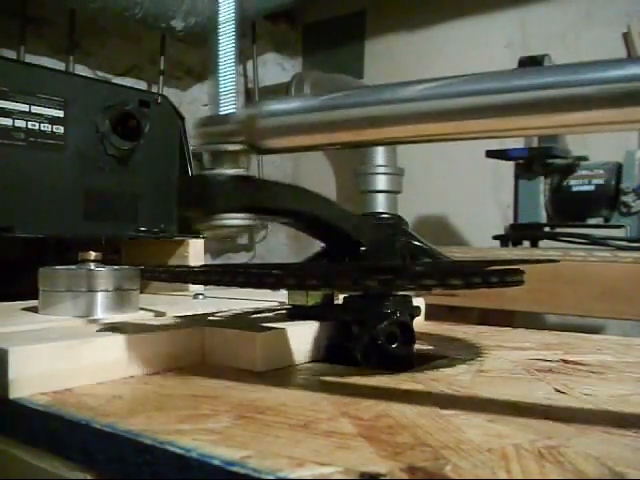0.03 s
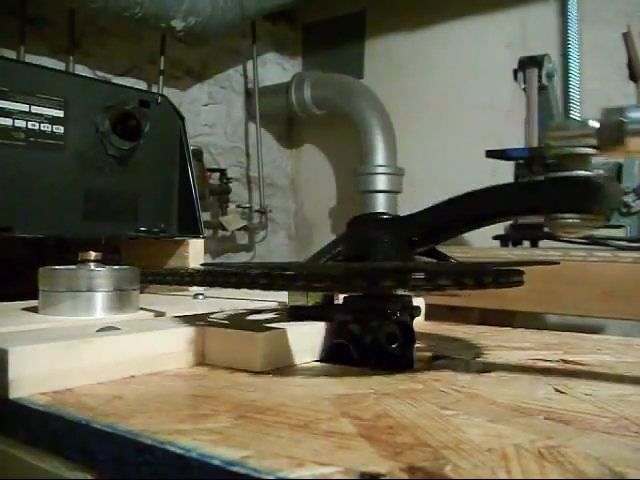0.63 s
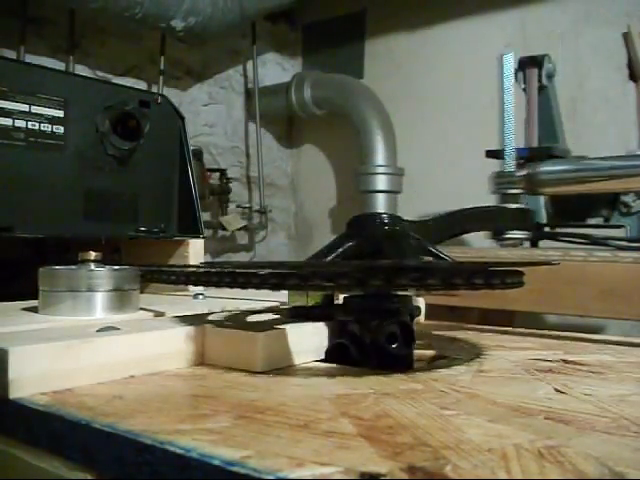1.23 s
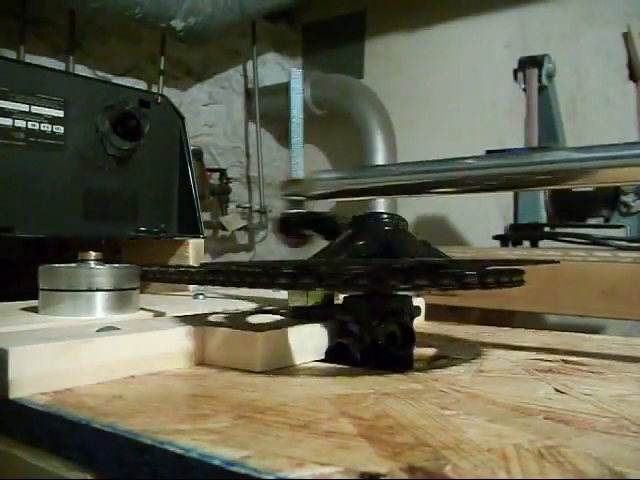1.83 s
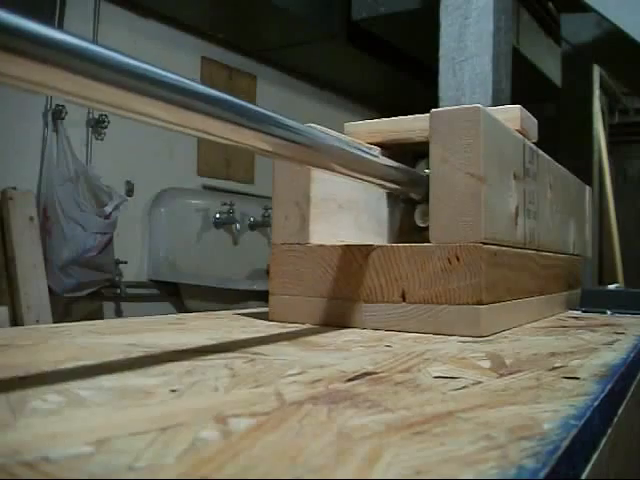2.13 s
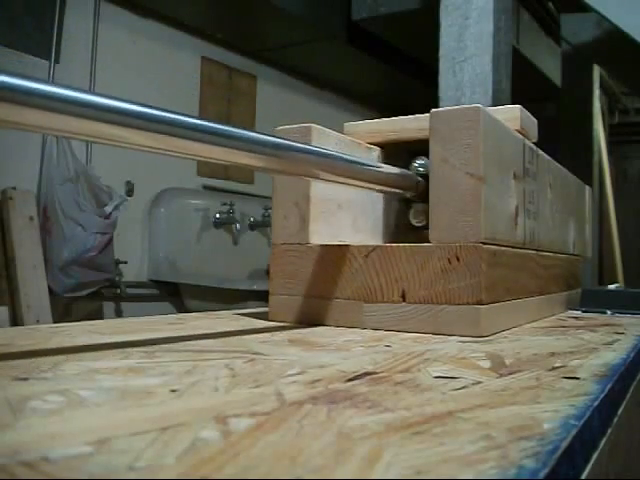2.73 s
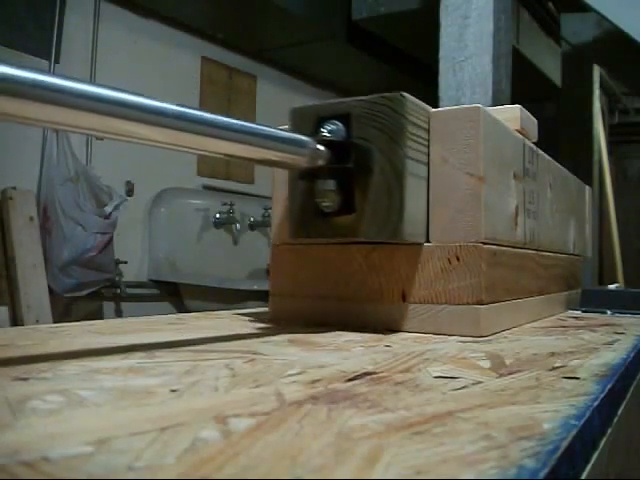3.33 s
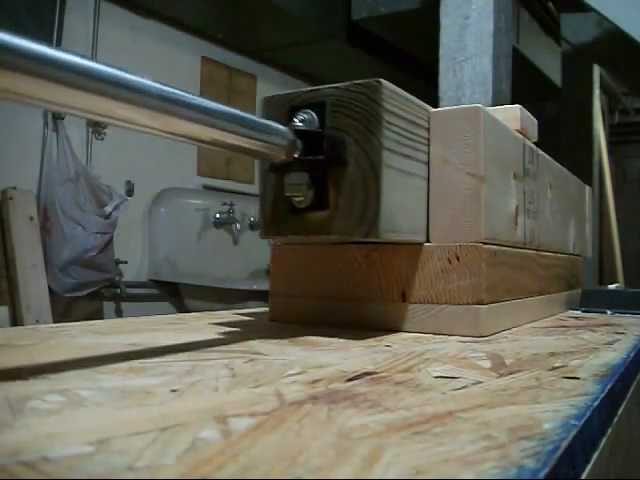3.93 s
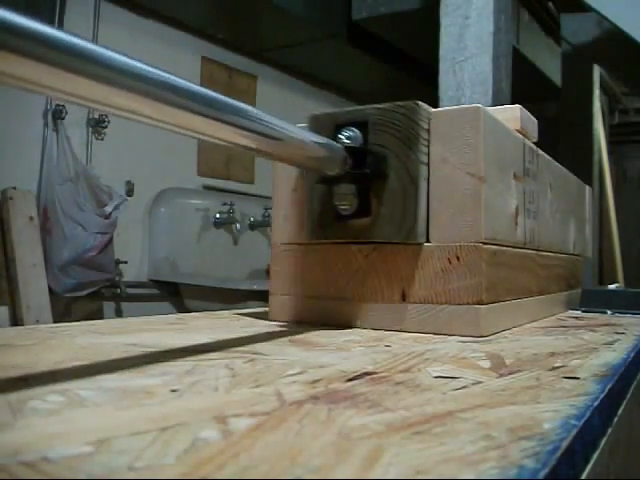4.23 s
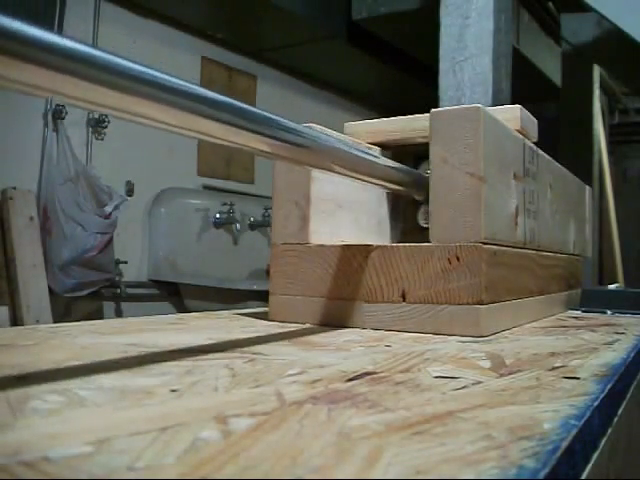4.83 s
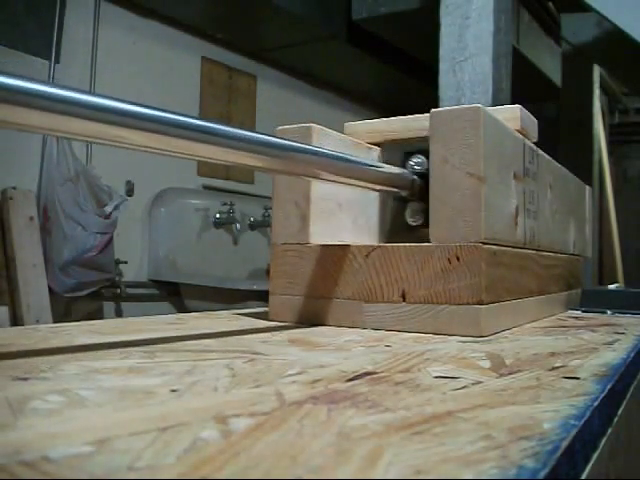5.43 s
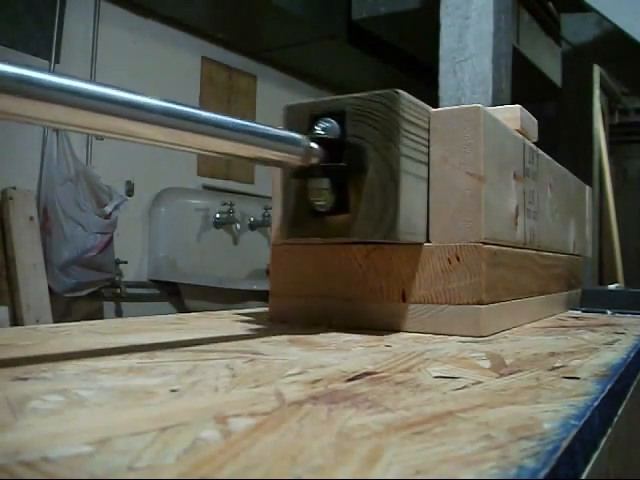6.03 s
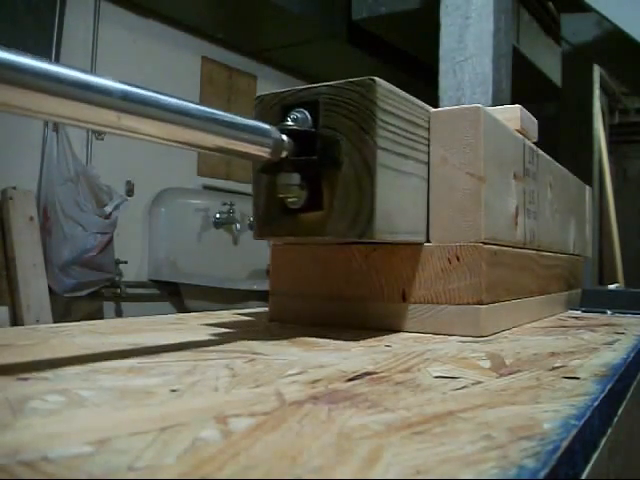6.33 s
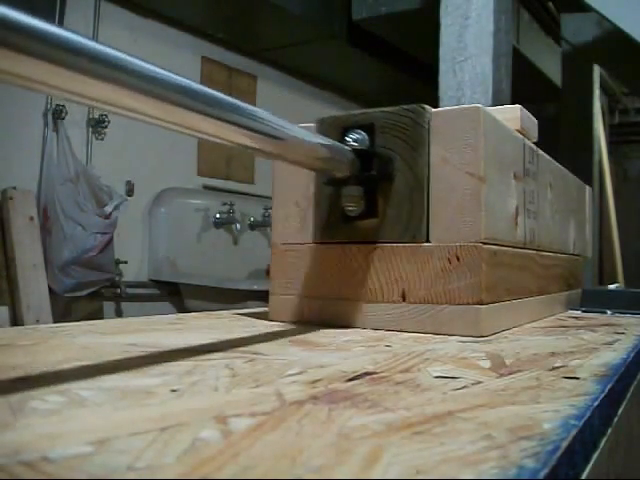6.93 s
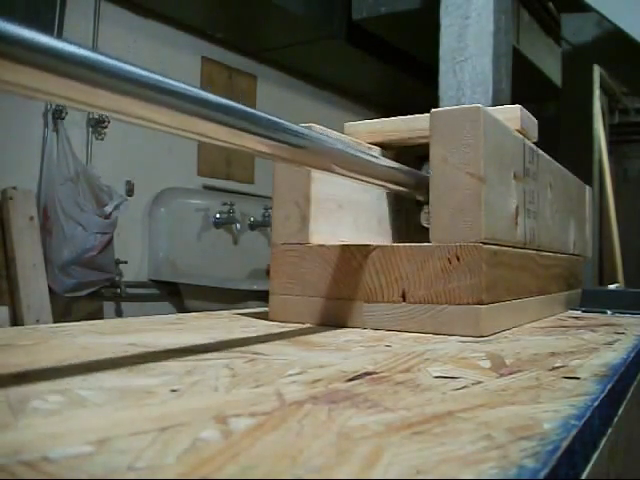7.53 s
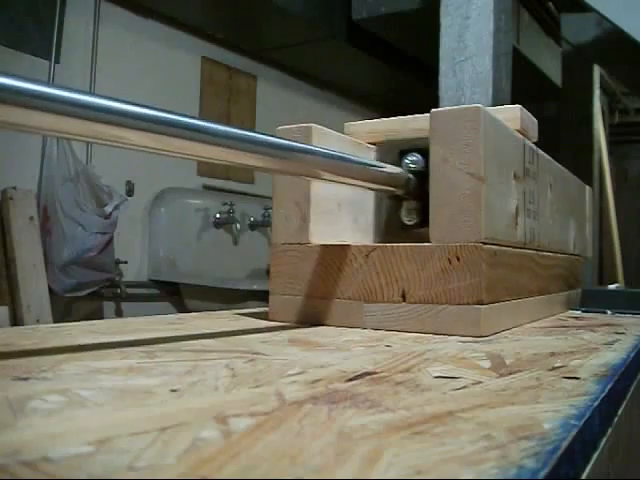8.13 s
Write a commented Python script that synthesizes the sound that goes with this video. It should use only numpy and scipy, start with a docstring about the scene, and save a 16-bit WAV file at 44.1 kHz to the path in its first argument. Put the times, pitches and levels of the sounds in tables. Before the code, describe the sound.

Close up in a workshop, a crank machine runs with a buzzing motor drone, a faint whine and a rattling chain. Sharp metal clacks with wooden thuds come in bunches a little over a second apart. About two seconds in, a short dropout and the loudest knock shift the listening spot from the crank to a sliding wooden block, which rubs, scuffs and judders as the drone swells and eases. The microphone sounds band-limited and distorts on hard hits.

```python
"""A small mains motor turns a chain wheel and crank, and a steel rod pushes a wooden block to and fro.
The motor hums through the bench, the chain rattles, the block rubs and binds in its wooden guide,
and at each end of the stroke the loose rod joints clack into the workshop.
Heard first beside the crank, then, after a short break, beside the block,
through a narrow-band recorder that overloads."""
import sys
import numpy as np
from scipy import signal
from scipy.fft import rfft, irfft, next_fast_len
from scipy.io import wavfile
from scipy.ndimage import uniform_filter1d

SR = 44100
rng = np.random.default_rng(int(sys.argv[2]) if len(sys.argv) > 2 else 0)


def log_audio(samples):
    """Write samples as a 16-bit WAV file to the path given in sys.argv[1]."""
    # one column per channel
    frames = np.atleast_2d(samples).T
    # limit to full scale, then quantise
    limited = np.clip(frames, -1, 1)
    pcm = np.round(limited * 32767).astype(np.int16)
    wavfile.write(sys.argv[1], SR, pcm)


N = 361179
TIME = np.arange(N) / SR
TURN_S, DEEPEST_S = 2.656, 2.54   # one crank turn; a moment when the block is deepest in its guide
PUSH_AT_S, PUSH_HALF_S = 2.35, 0.31   # where in the turn the block is pushed home

# Modes of the free steel rod. Each row: pitch in Hz, level in dB, ring time (t60) in seconds.
ROD_MODES = [(1335, -14, .08), (1510, -7, .17), (2058, -9, .18), (2686, -3, .14), (2950, -7, .08),
             (3085, -10, .1), (3340, -1, .16), (3400, -8, .1), (4040, 0, .2), (4080, -6, .17),
             (4836, -4, .2), (4885, -8, .16)]
# The colour of wood rubbing on wood. Each row: frequency in Hz, level in dB.
RUB_COLOUR = [(500, -27.5), (900, 1), (1100, -1), (1420, 1), (1700, -4.5), (2050, -7), (2400, -7),
              (3400, -28.5), (5500, -19)]
# The dropout between the two listening places. Each row: time in seconds, gain in dB.
BREAK_DIP = [(2.028, 0), (2.030, -18), (2.060, -17), (2.063, -6), (2.082, -5), (2.088, 0)]


def motor(mains_hz=60, crank_drone_hz=120.2, block_drone_hz=119.7, sag_hz=.7):
    """Magnetic buzz and whine locked to the mains, over a drone that sags and swells with the load."""
    # The motor beside the crank. Each row: time in seconds, then drone, buzz and whine levels in dB.
    at_crank = [(0, -26, -36, -45), (.36, -24, -39, -39), (.55, -30.5, -38, -42), (.88, -32, -45.5, -37),
                (1.03, -43, -41, -40), (1.15, -29, -36, -40.5), (1.66, -29.5, -32.5, -49),
                (1.92, -46, -38.5, -44), (2.02, -52, -31, -51)]
    # Beside the block. Each row: seconds into the turn, then drone, buzz and whine levels in dB.
    at_block = [(.03, -31, -24, -32.5), (.11, -24, -29, -30.5), (.25, -14, -25, -43.5),
                (.48, -17, -24, -41), (.8, -26, -26.5, -29.5), (.94, -34, -23.5, -33),
                (1.05, -26, -23.5, -36), (1.33, -21.5, -23.5, -31.5), (1.45, -23.5, -29.5, -29.5),
                (1.55, -16, -24.5, -30.5), (1.96, -24.5, -30, -29), (2.17, -15, -23, -31),
                (2.35, -16.5, -23, -38.5), (2.54, -16, -21, -31.5)]
    # Buzz partials. Each row: multiple of twice the mains frequency, dB at the crank, dB at the block.
    partials = [(.5, -22.5, -22), (2, 0, 0), (3, -11.5, -4.5), (4, -10, -19), (5, -8, -15.5),
                (7, -20, -9.5), (9, -14.5, -20.5), (10, -16.5, -27)]
    drone_db, buzz_db, whine_db = by_place(in_time(at_crank), every_turn(at_block))
    # From 2.09 s, drone and buzz start subdued and rise back over half a second.
    subdued = by_place(0, np.clip(1 - (TIME - BREAK_DIP[-1][0]) / .5, 0, 1))
    drone_db = drone_db - 14.5 * subdued
    buzz_db = buzz_db - 10 * subdued
    push = swell(in_turn(), PUSH_AT_S, PUSH_HALF_S)
    drone_hz = by_place(crank_drone_hz, block_drone_hz - sag_hz * push)
    hum = from_db(drone_db + 0.81 * drift(14)) * sine(drone_hz)
    # The rotor thrums through the bench, an octave down, while it pushes the block.
    thrum = by_place(0, from_db(-39.5) * swell(in_turn(), at_s=1.8, half_s=0.44))
    hum += thrum * sine(drone_hz / 2)
    hum += from_db(whine_db) * np.sin(2 * np.pi * 12 * mains_hz * TIME)
    for multiple, crank_db, block_db in partials:
        phase = 2 * np.pi * (2 * multiple * mains_hz * TIME + rng.random())
        level_db = buzz_db + by_place(crank_db, block_db) + 2.1 * drift(3.4)
        hum += from_db(level_db) * np.sin(phase + 0.46 * drift(6.5))
    return np.sqrt(2) * hum


def clacks(chatter_s=0.0053, ping_s=0.0062, detune=0.00082):
    """Loose joints knock as the stroke reverses: metal chatter, a ping, rod ring and a wooden thud."""
    # The knocks. Each row: start in seconds, level in dB, ping in Hz, relative thud and ring in dB.
    knocks = [(.222, -21, 4450, 1, -4.5), (0.628, -19, 2420, 2.5, -13), (0.778, -13, 4740, -8.5, -8.5),
              (0.8549, -5, 3930, -15, -15), (.900, -6.5, 4730, -9, -12), (.9175, -11.5, 4160, -3, -8),
              (.9241, -9, 3150, 5.5, -6.5), (1.156, -21, 4390, 1, -14), (2.0885, 12.5, 4035, -23, -10.5),
              (2.0944, 5.5, 2670, -18, -8.5), (2.099, 0.5, 1490, -20, -14), (2.1113, 8.5, 3330, -12.5, -27),
              (2.540, -7, 3340, -4, -6), (2.5847, -4, 4140, -20, -5), (2.599, -4, 3040, -23, -30),
              (2.604, -5.5, 2700, -5.5, -4.5), (3.688, -19.5, 3440, -5, -16.5), (3.707, -15, 3500, -1, -14),
              (3.756, -15.5, 3310, -1, -19), (3.847, 1.5, 3387, -30, -14.5), (3.8635, -8, 3270, -21, -9),
              (3.917, -8, 4560, -9, -5), (3.9234, -7, 3020, -6, -21), (3.941, -11, 3600, -3, -27),
              (3.98, -8.5, 3342, -9.5, -10), (4.744, -19, 3853, -10.5, -12), (5.1954, -7.5, 4860, -4.5, -9),
              (5.241, -10.5, 4030, -5, -4.5), (5.256, 0, 2970, -13, -22), (5.2661, -13.5, 2860, -3, -22),
              (6.349, -15.5, 3400, -3.5, -11.5), (6.398, -19.5, 3410, -4, -12),
              (6.415, -13, 3320, -0.5, -20), (6.513, -6, 4080, -12.5, -7), (6.536, -9.5, 4130, -10.5, -9.5),
              (6.576, -10.5, 4010, -7.5, -7.5), (6.590, -5, 3250, -6.5, -21), (6.600, -6, 3120, -12, -20),
              (6.626, -16.5, 3000, 1.5, -20), (7.8536, -3, 3296, -8.5, -5),
              (7.8987, -4.5, 4080, -19.5, -20), (7.9114, -4.5, 4847, -13, -20), (7.920, -4, 3100, -8, -19)]
    # Modes of block and guide. Each row: pitch in Hz, level in dB, ring time (t60) in seconds.
    wood_modes = [(341.7, 2, 0.043), (461, -3, 0.12), (574, -6, 0.088), (792, -5, 0.087),
                  (894, -12.5, 0.06)]
    # Noise colours of the metal contact and the thud. Each row: frequency in Hz, level in dB.
    crack_colour = [(500, -29.5), (1300, 1.5), (2200, -7), (2800, 3), (3400, 2), (3750, -0.5), (4100, -0.5),
                    (4450, -3), (4950, -2), (5600, -10)]
    thud_colour = [(60, -20), (200, 1.5), (420, -4), (800, 4), (1200, -8), (2400, -9), (5000, -41.5)]
    out, t = np.zeros(N + SR), TIME[:SR // 4]
    rod_hz, rod_db, rod_t60 = np.transpose(ROD_MODES)[:, :, None]
    wood_hz, wood_db, wood_t60 = np.transpose(wood_modes)[:, :, None]
    for start_s, level_db, ping_hz, thud_db, ring_db in knocks:
        noise = rng.standard_normal((2, len(t)))
        crack = from_db(-7) * coloured(noise[0], crack_colour) * np.exp(-t / chatter_s)
        ping = from_db(-5) * np.sin(2 * np.pi * ping_hz * t) * np.exp(-t / ping_s)
        ring_hz = rod_hz * (1 + detune * rng.standard_normal(rod_hz.shape))   # load shifts the modes
        # The rod is pressed with the block deep in; drawn out, it is slacker and rings longer.
        drawn_out = np.sin(np.pi * (start_s - DEEPEST_S) / TURN_S) ** 2
        ring_t60 = rod_t60 * (.2 + .5 * drawn_out)
        ring = from_db(ring_db - 3) * struck(t, ring_hz, rod_db, ring_t60, spread_db=2)
        wood = struck(t, wood_hz, wood_db, wood_t60, spread_db=3.5)
        wood += from_db(-1) * coloured(noise[1], thud_colour) * np.exp(-t / 0.014)
        thud = from_db(thud_db - 4) * wood * (1 - np.exp(-t / 0.00043))
        start = round(start_s * SR)
        out[start:start + len(t)] += from_db(level_db) * (crack + ping + ring + thud)
    return out[:N]


def bench(friction_db):
    """Gear teeth and chain links patter into the bench, whose rumble rises with friction and push."""
    # Rumble colours beside the crank and beside the block. Each row: frequency in Hz, level in dB.
    crank_colour = [(25, -19.5), (42, -6), (64, -14.5), (90, -6), (125, 3.5), (190, -16), (250, 3),
                    (590, -8.5), (790, 0.5), (1200, -21), (1600, -51.5)]
    block_colour = [(27, -7), (40, -24), (58, -13), (90, -10), (125, -4.5), (165, -5), (240, -6.5),
                    (290, -7), (650, -16.5), (730, -8.5), (1200, -21), (1600, -52)]
    push_db = 0.25 * swell(in_turn(), PUSH_AT_S, PUSH_HALF_S)
    level_db = by_place(-25.5, -22.5 + push_db) + .6 * friction_db
    patter = boards(grains(per_s=3500, spread_db=1.5))
    noise = rng.standard_normal(N)
    rumble = by_place(coloured(noise, crank_colour), coloured(noise, block_colour))
    return from_db(level_db) * (from_db(-3) * patter + from_db(-5.5) * rumble)


def chain(friction_db):
    """Rollers tick over the sprocket and keep the rod faintly ringing."""
    # Hiss colours beside the crank and beside the block. Each row: frequency in Hz, level in dB.
    crank_colour = [(1180, -27), (2000, -5), (2120, -3), (2190, -9), (2600, -9), (2870, -6), (3180, -7.5),
                    (3350, -7.5), (3610, -7), (4310, -7.5), (5100, -11), (6630, -19), (11200, -120)]
    block_colour = [(1180, -35.5), (2000, 0), (2310, -10), (2680, -2.5), (3050, -2), (3310, -1), (3520, -3),
                    (4100, -1.5), (4550, -3.5), (4850, -5.5), (5100, -6.5), (6630, -20.5), (11200, -120)]
    level_db = by_place(-31.5, -34.5) + 0.99 * friction_db
    ticks = grains(per_s=4100, spread_db=2) * from_db(1.5 * drift(18))
    hiss = by_place(coloured(ticks, crank_colour), coloured(ticks, block_colour))
    ring = rms_one(sum(from_db(db) * resonate(ticks, hz, 4.5 / t60) for hz, db, t60 in ROD_MODES))
    return from_db(level_db) * (from_db(-2.5) * hiss + from_db(-14) * ring)


def rubbing(friction_db):
    """Wood fibres catch and let go in uneven clumps as the block slides."""
    level_db = by_place(-33.5, -34) + 1.05 * friction_db
    catches = grains(per_s=3500, spread_db=0) * from_db(2 * drift(22))
    return from_db(level_db) * coloured(catches, RUB_COLOUR)


def scuffs(scuff_half_s=0.017):
    """The block catches with short gritty scuffs; longer binds on the push shake the bench harder."""
    # Brief catches. Each row: centre in seconds, level in dB.
    snags = [(.233, -27.5), (1.032, -34), (1.377, -32), (1.523, -27.5), (2.472, -31), (2.87, -30),
             (3.213, -30), (3.388, -31.5), (3.564, -27.5), (4.218, -28.5), (4.96, -32), (5.664, -33),
             (6.016, -31.5), (6.08, -30), (7.68, -32), (7.82, -28)]
    # Binds halfway in and near the end. Each row: centre in seconds, level in dB, half length in seconds.
    binds = [(4.674, -29, 0.041), (5.094, -37, .09), (7.334, -28, 0.065), (7.756, -35, 0.19)]
    scuffing = sum(from_db(db) * swell(TIME, at_s, scuff_half_s) for at_s, db in snags)
    binding = sum(from_db(db) * swell(TIME, at_s, half_s) for at_s, db, half_s in binds)
    catches = grains(per_s=2300, spread_db=2.5)
    grit = from_db(3) * (scuffing + binding) * coloured(catches, RUB_COLOUR)
    body = (from_db(-.5) * scuffing + from_db(10.5) * binding) * boards(catches)
    return grit + body


def scrapes(width_hz=980):
    """Steel slides on steel in the rod's joints: thin, dry swells, each around its own pitch."""
    # Each row: centre in seconds, level in dB, half length in seconds, pitch in Hz.
    slides = [(0.076, -28, 0.023, 5200), (0.24, -27, 0.038, 5450), (.8, -27, 0.033, 5150),
              (4.21, -35.5, 0.051, 2700), (4.29, -36.5, 0.036, 3970), (5.892, -30, 0.014, 3230)]
    catches = grains(per_s=1400, spread_db=2)
    return sum(from_db(db) * swell(TIME, at_s, half_s) * rms_one(resonate(catches, hz, width_hz))
               for at_s, db, half_s, hz in slides)


def shudder(slip_hz=60):
    """The block sticks and slips with a low judder where it overhangs the guide."""
    # Each row: centre in seconds, level in dB.
    judders = [(3.8, -28), (6.455, -24)]
    level = sum(from_db(db) * swell(TIME, at_s, half_s=0.1) for at_s, db in judders)
    return np.sqrt(2) * level * sine(slip_hz + 3 * drift(6.9))


def gears(mesh_hz=1417, level_db=-47):
    """A faint wavering mesh tone, carried along the rod to the block."""
    tone = np.sqrt(2) * sine(mesh_hz * (1 + .002 * drift(2)))
    return by_place(0, from_db(level_db + 2 * drift(3)) * tone)


def boards(x):
    """The bench top resonates with whatever shakes it; rms 1."""
    # Its modes. Each row: pitch in Hz, width in Hz, level in dB.
    modes = [(161.6, 25, 1.5), (202, 17, 0), (236, 28, 0.5), (299.8, 20, 4.5), (316.4, 17, 6.5),
             (368.7, 49, 1.5), (448, 36, 1.5), (520.4, 32, -2), (569.4, 28, -2), (671, 45, -5),
             (763, 58, -2.5), (835, 72, -7.5)]
    return rms_one(sum((-1) ** k * from_db(db) * resonate(x, hz, width_hz)
                       for k, (hz, width_hz, db) in enumerate(modes)))


def workshop(x, t60=0.44, wet_db=-13):
    """Adds diffuse echoes from the masonry walls."""
    t = TIME[:SR // 2]
    tail = rng.standard_normal(len(t)) * np.exp(-np.log(1000) * t / t60) * (1 - np.exp(-t / 0.0028))
    return x + from_db(wet_db) * signal.fftconvolve(x, tail / np.linalg.norm(tail))[:N]


def gain_control(x, threshold_db=-6, attack_s=0.04):
    """Very loud knocks pull the gain down, too late to save the attack; it then creeps back."""
    level_db = 10 * np.log10(np.abs(uniform_filter1d(x ** 2, size=256)) + 1e-9)
    over_db = np.maximum(level_db - threshold_db, 0)
    release_ramp = 55 * TIME
    held_db = np.maximum.accumulate(over_db + release_ramp, axis=-1) - release_ramp
    pole = np.exp(-1 / (attack_s * SR))
    return x * from_db(-.6 * signal.lfilter([1 - pole], [1, -pole], held_db))


def by_place(at_crank, at_block):
    """The listener moves from crank to block during the break."""
    return np.where(TIME < BREAK_DIP[1][0], at_crank, at_block)


def in_turn():
    """Seconds since the block was last deepest in its guide."""
    return (TIME - DEEPEST_S) % TURN_S


def every_turn(rows):
    """Each column of a curve that repeats with the crank, at every sample."""
    seconds, *columns = np.transpose(rows)
    return [np.interp(in_turn(), seconds, column, period=TURN_S) for column in columns]


def in_time(rows):
    """Each column of a curve at every sample, its end values held."""
    seconds, *columns = np.transpose(rows)
    return [np.interp(TIME, seconds, column) for column in columns]


def swell(t, at_s, half_s):
    """A bell-shaped rise and fall of height 1."""
    return np.exp(-np.minimum(((t - at_s) / half_s) ** 2, 20))


def drift(rate_hz):
    """A slow random wander with a spread of 1."""
    hop, settle = 40, 2000
    pole = np.exp(-2 * np.pi * rate_hz * hop / SR)
    noise = rng.standard_normal(N // hop + settle + 2)
    slow = signal.lfilter([1], [1, -2 * pole, pole * pole], noise)[settle:]
    return np.interp(np.arange(N) / hop, np.arange(len(slow)), rms_one(slow))


def grains(per_s, spread_db):
    """Tiny random contacts; spread_db makes their sizes uneven."""
    sizes = from_db(spread_db * np.minimum(rng.exponential(1, N), 4)) * rng.choice([-1, 1], N)
    return sizes * (rng.random(N) < per_s / SR)


def struck(t, hz, db, t60, spread_db):
    """Decaying modes, each with a random strength and phase."""
    strengths = from_db(db + spread_db * rng.standard_normal(hz.shape))
    tones = np.sin(2 * np.pi * (hz * t + rng.random(hz.shape)))
    return np.sum(strengths * from_db(-60 * t / t60) * tones, axis=0)


def coloured(x, spectrum):
    """Gives a steady excitation a spectrum; rms 1."""
    size = next_fast_len(len(x))
    hz, db = np.transpose(spectrum)
    log_hz = np.log(np.arange(size // 2 + 1) * SR / size + 1e-3)
    gain = from_db(np.interp(log_hz, np.log(hz), db, left=-90, right=-90))
    return rms_one(irfft(rfft(x, size) * gain, size)[:len(x)])


def resonate(x, hz, width_hz):
    """One resonance with gain 1 at its peak."""
    radius = np.exp(-np.pi * width_hz / SR)
    feedback = [1, -2 * radius * np.cos(2 * np.pi * hz / SR), radius ** 2]
    return signal.lfilter(np.array([1, 0, -1]) * (1 - radius ** 2) / 2, feedback, x)


def sine(hz):
    """A sine that follows a pitch curve."""
    return np.sin(2 * np.pi * np.cumsum(hz) / SR)


def from_db(db):
    """Decibels to gain."""
    return 10 ** (np.asarray(db) / 20)


def rms_one(x):
    """Scales to unit rms."""
    return x / np.sqrt(np.mean(x ** 2) + 1e-20)


def scene():
    """The whole machine: friction drives the running noise; a break parts the two listening places."""
    # Friction in the mechanism, beside the crank. Each row: time in seconds, level in dB.
    crank_friction = [(.1, -4.5), (.45, -2), (.6, 0), (.92, 1), (1.25, -2.5), (2, -3.5)]
    # Friction beside the block. Each row: seconds into the turn, level in dB.
    block_friction = [(.03, 6), (.16, 0.5), (.4, 2), (.7, 2.5), (1.1, 0.5), (1.36, 5), (1.58, 0.5),
                      (1.85, 0), (2.15, 3.5), (2.33, 1), (2.6, 3)]
    # Running noise, lifted before the break and subdued after. Each row: time in seconds, gain in dB.
    running_fader = [(2.04, 5.5), (2.11, 0.5), (2.22, -5.5), (2.42, -8.5), (2.55, -1.5)]
    friction_db, = by_place(in_time(crank_friction), every_turn(block_friction))
    break_db, = in_time(BREAK_DIP)
    running_db, = in_time(running_fader)
    running = motor() + gears() + bench(friction_db) + chain(friction_db) + rubbing(friction_db)
    contacts = scuffs() + scrapes() + shudder() + workshop(clacks())
    return (from_db(break_db) * (from_db(running_db) * running + contacts))[None]


def record(dry, band_hz=5240, cutoff_hz=16000):
    """The input overloads, is narrowed to a telephone-like band, and overshoots clip at full scale."""
    overloaded = np.clip(gain_control(dry), -.88, .88)
    narrow = signal.sosfilt(signal.ellip(9, .3, 75, band_hz, fs=SR, output="sos"), overloaded)
    clipped = np.clip(narrow, -1, 1)
    return signal.sosfilt(signal.ellip(10, .3, 75, cutoff_hz, fs=SR, output="sos"), clipped)


dry = scene()
out = record(dry)
log_audio(out)
```